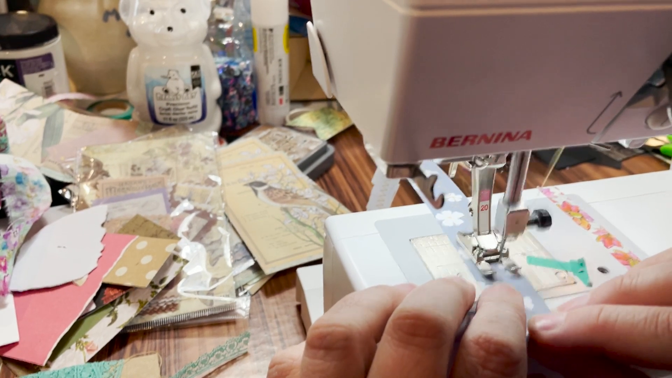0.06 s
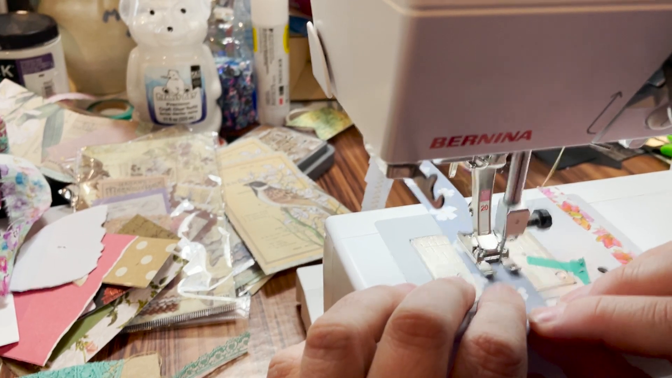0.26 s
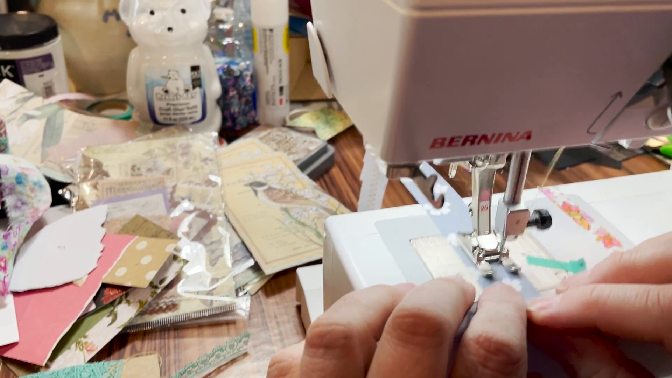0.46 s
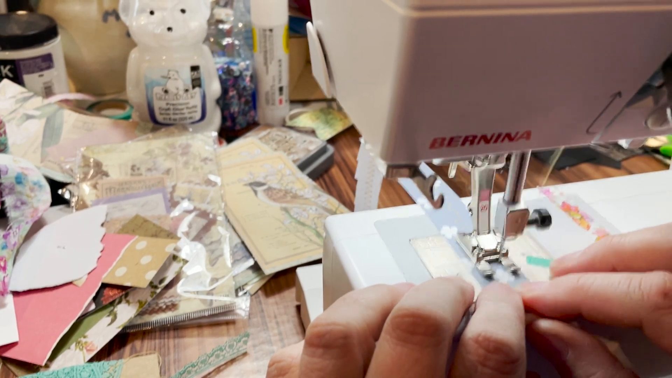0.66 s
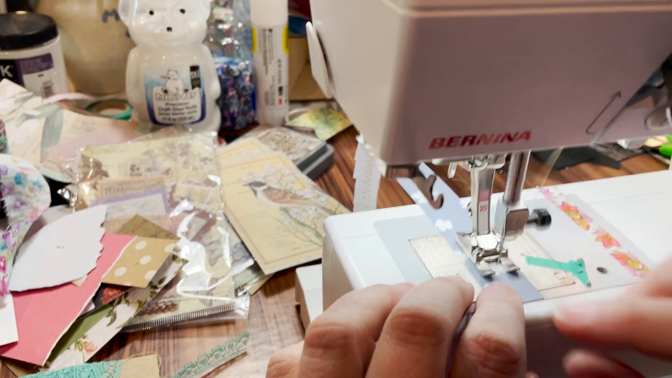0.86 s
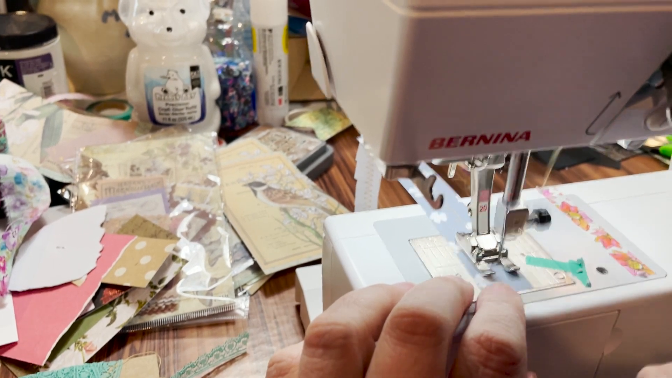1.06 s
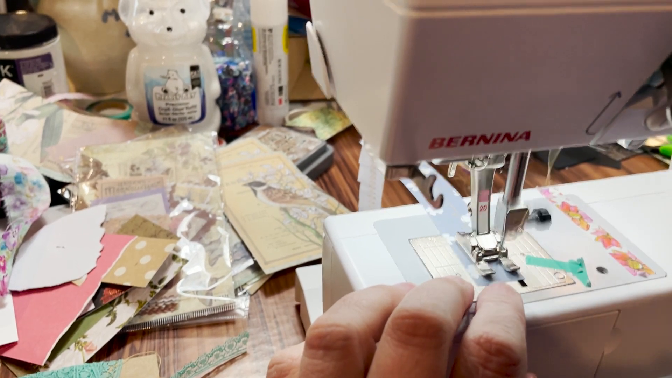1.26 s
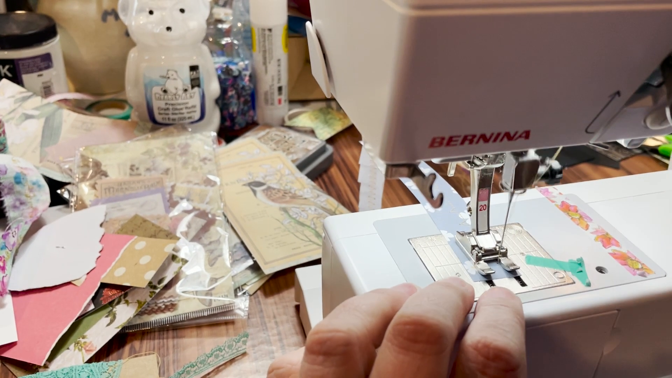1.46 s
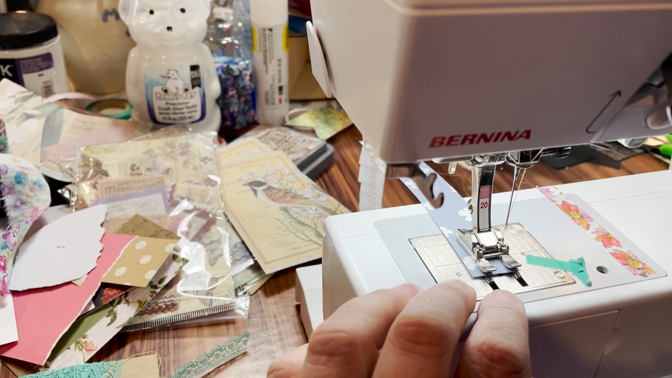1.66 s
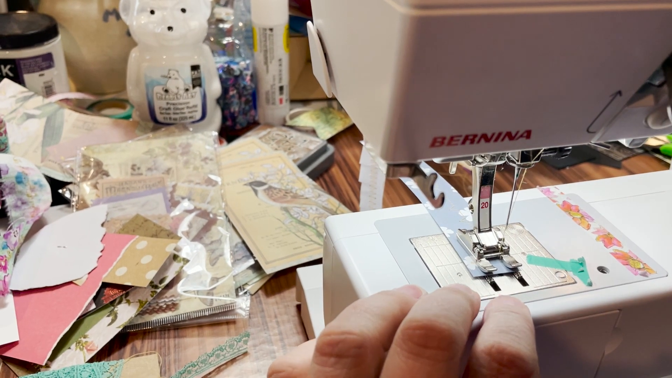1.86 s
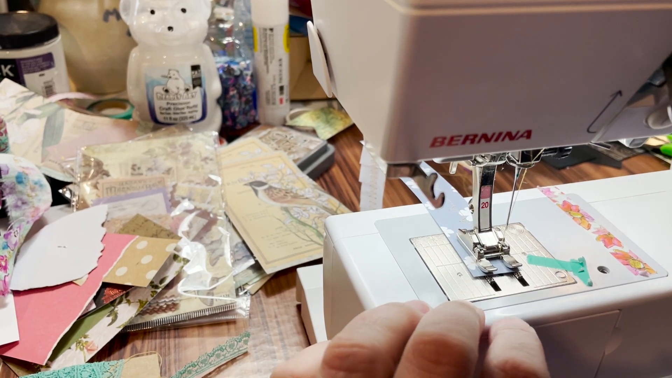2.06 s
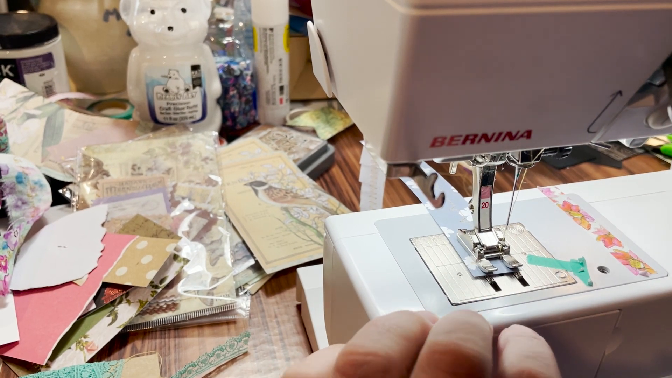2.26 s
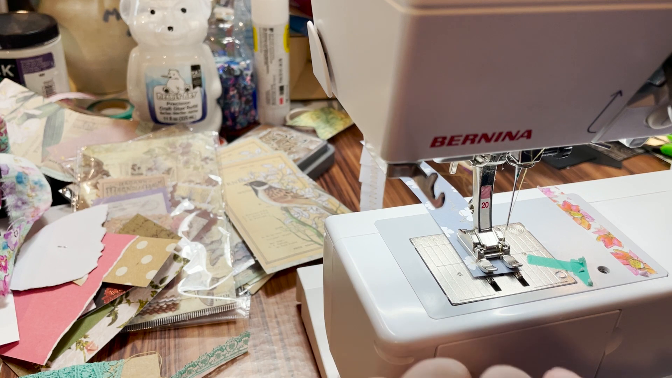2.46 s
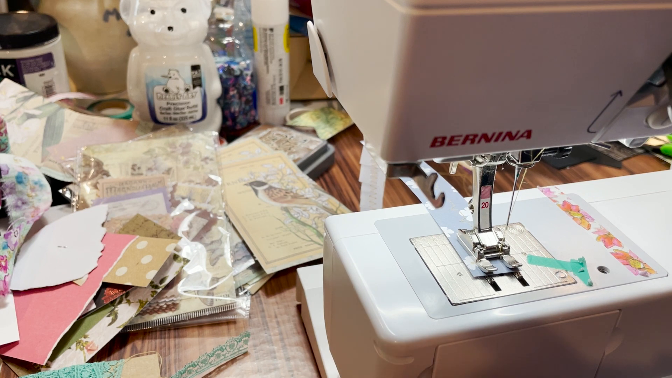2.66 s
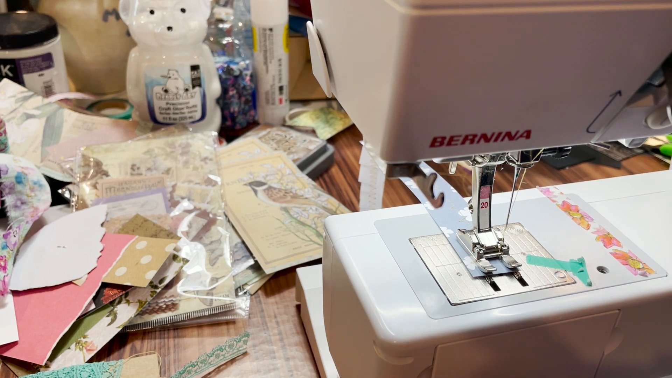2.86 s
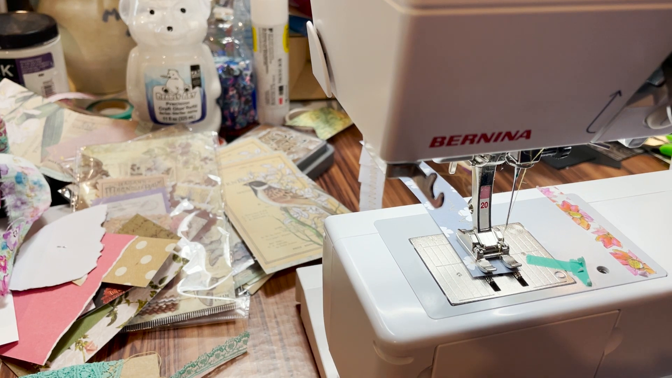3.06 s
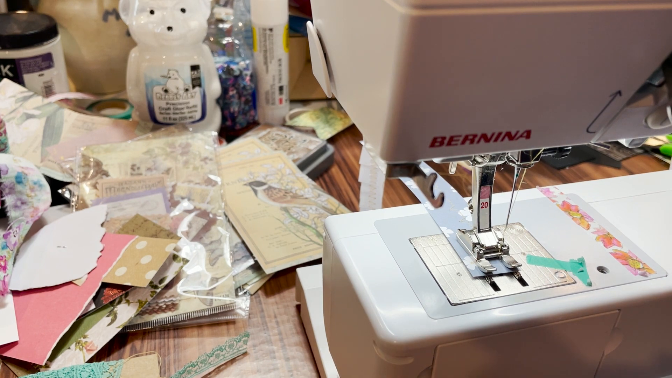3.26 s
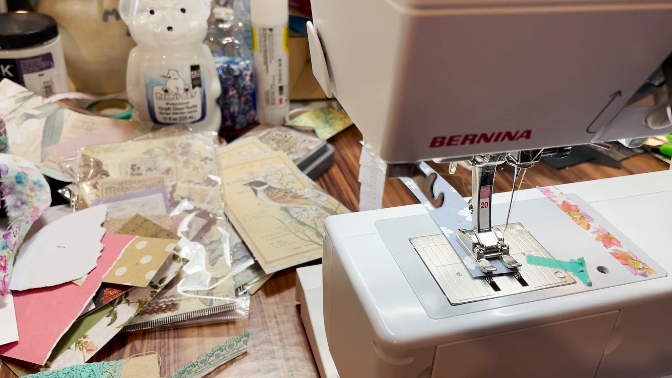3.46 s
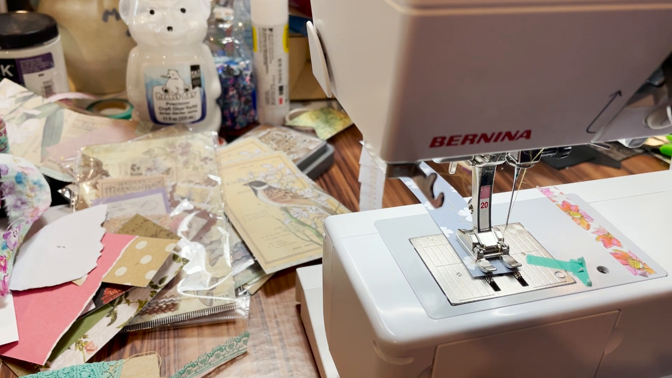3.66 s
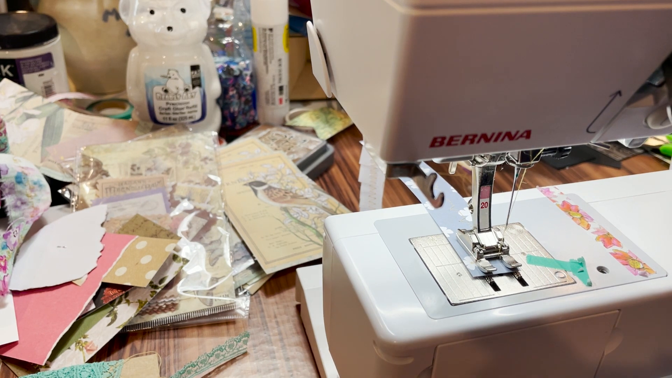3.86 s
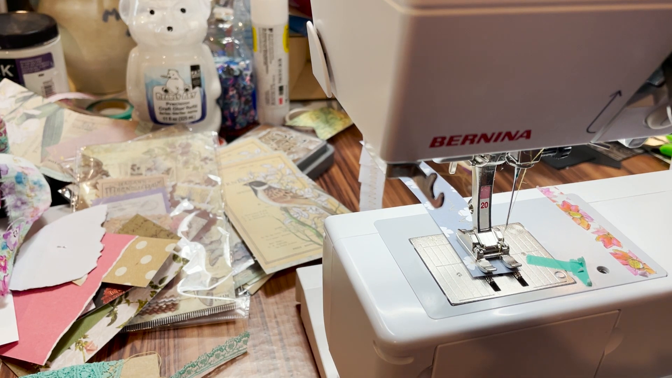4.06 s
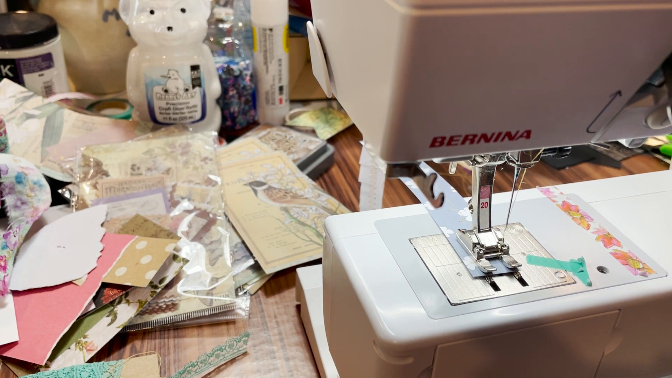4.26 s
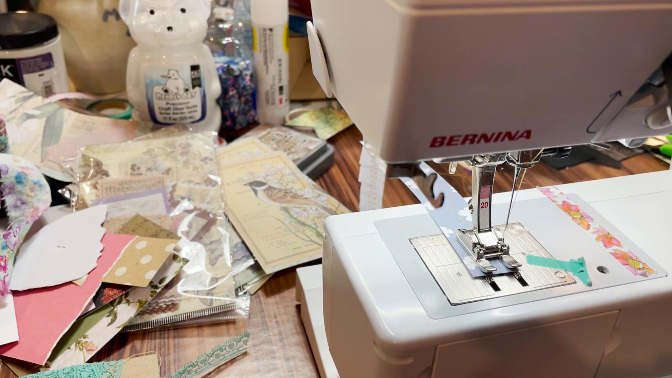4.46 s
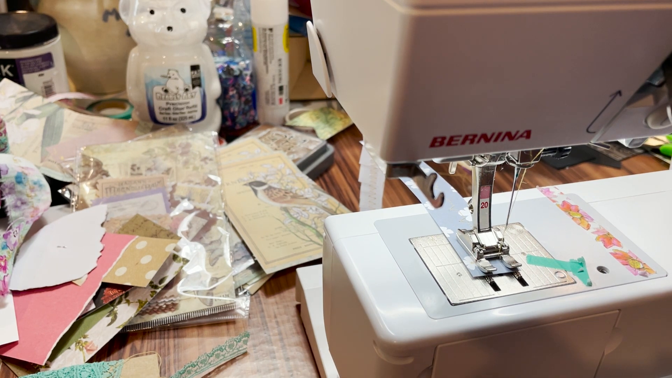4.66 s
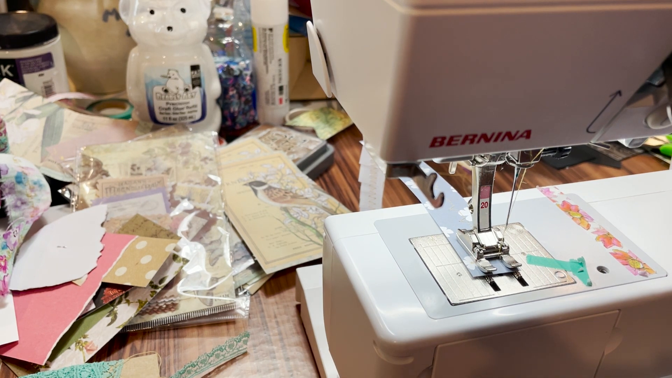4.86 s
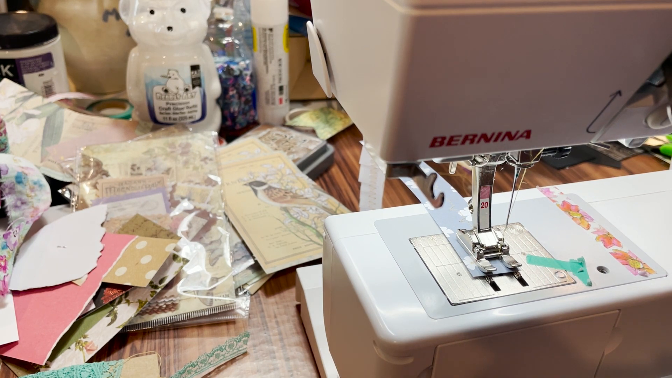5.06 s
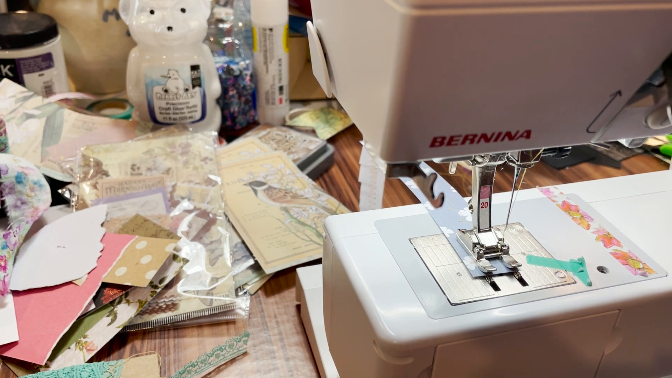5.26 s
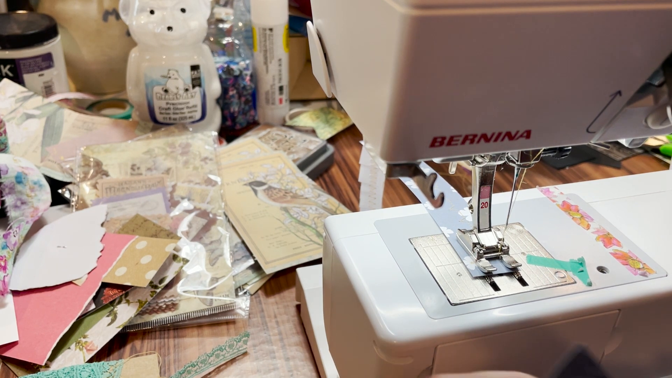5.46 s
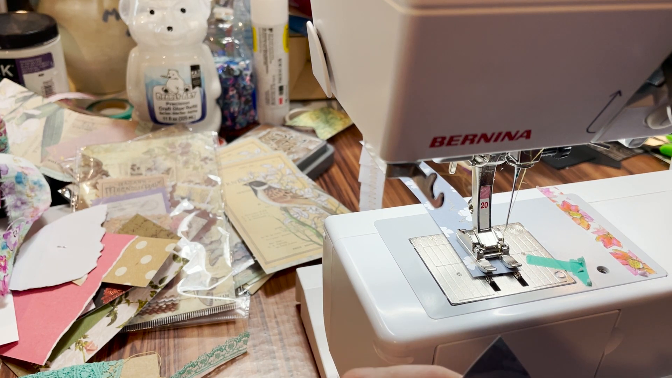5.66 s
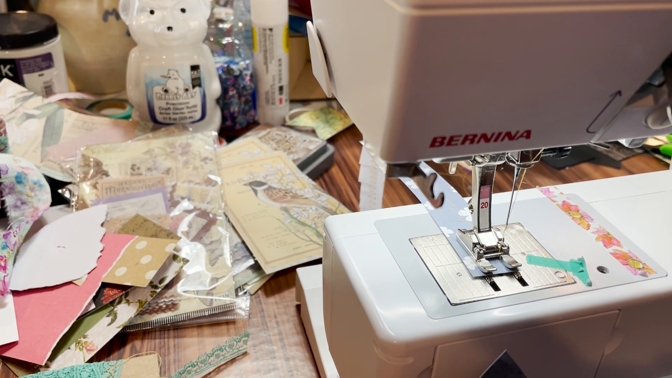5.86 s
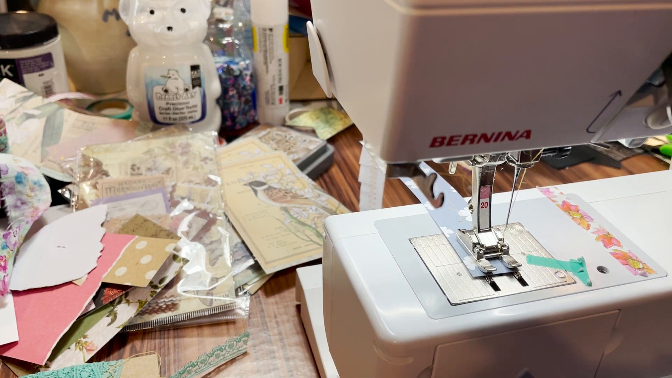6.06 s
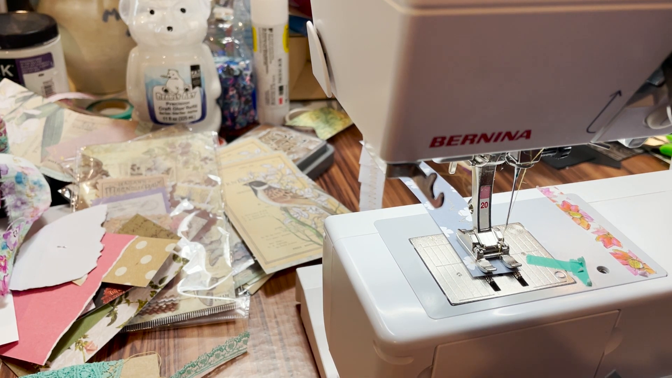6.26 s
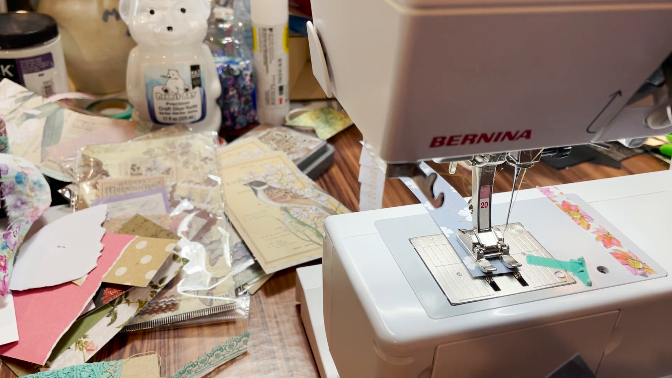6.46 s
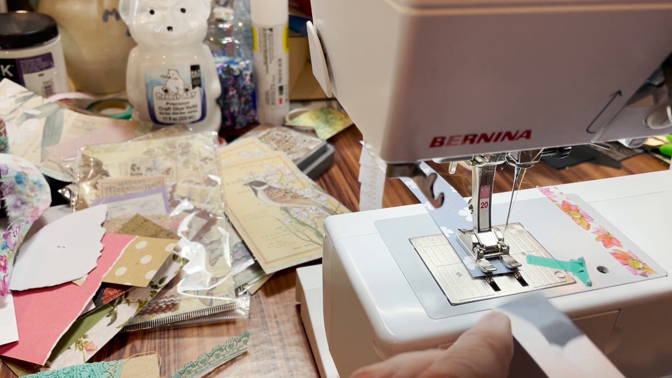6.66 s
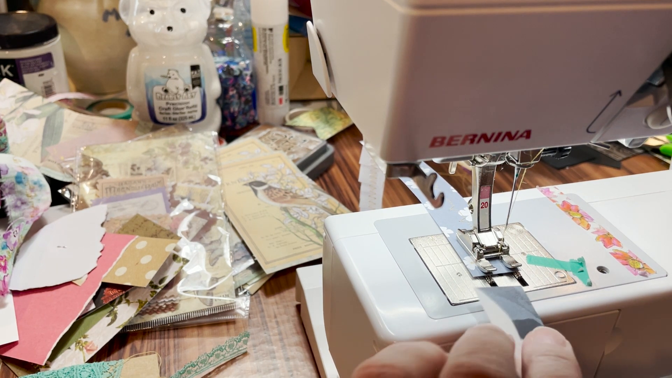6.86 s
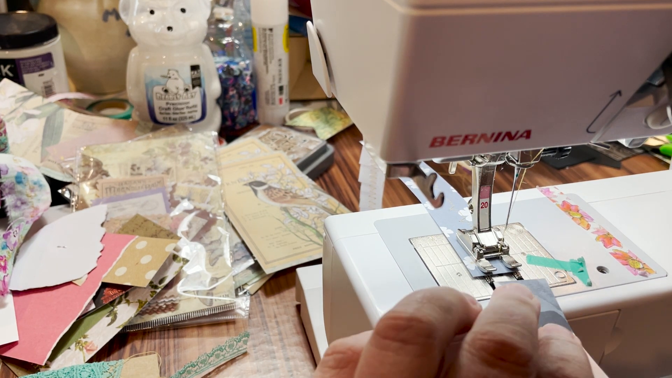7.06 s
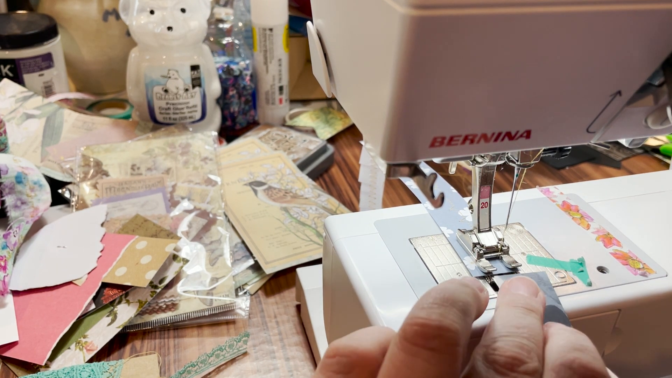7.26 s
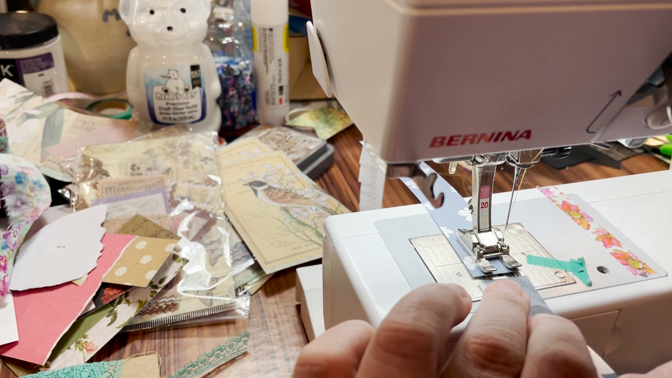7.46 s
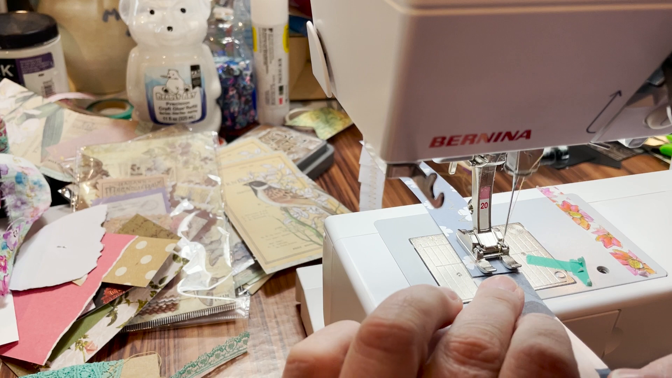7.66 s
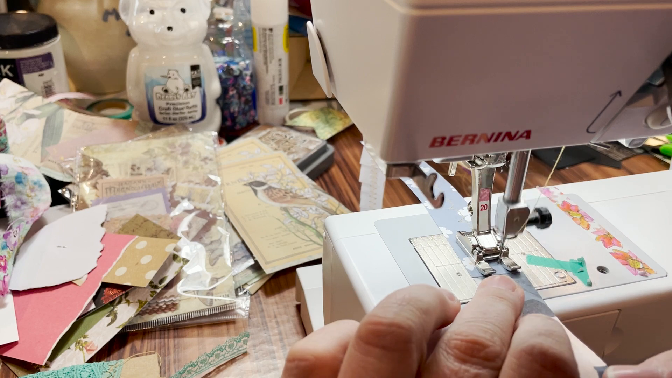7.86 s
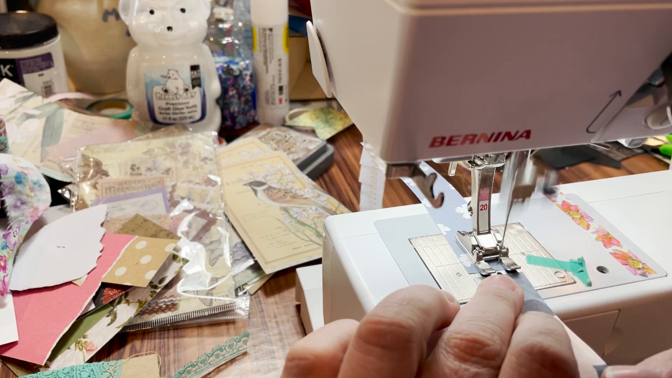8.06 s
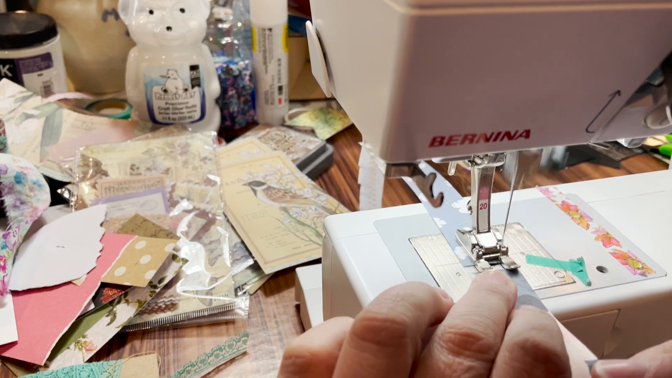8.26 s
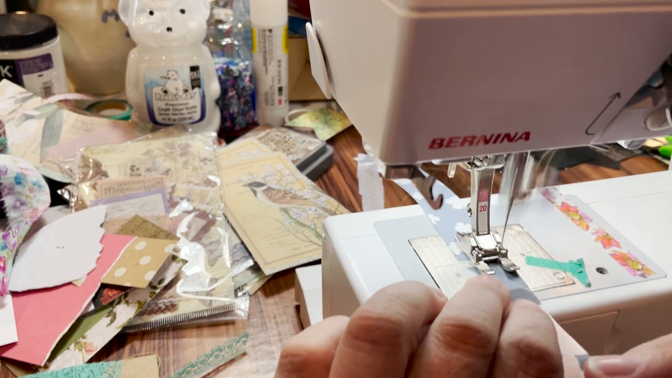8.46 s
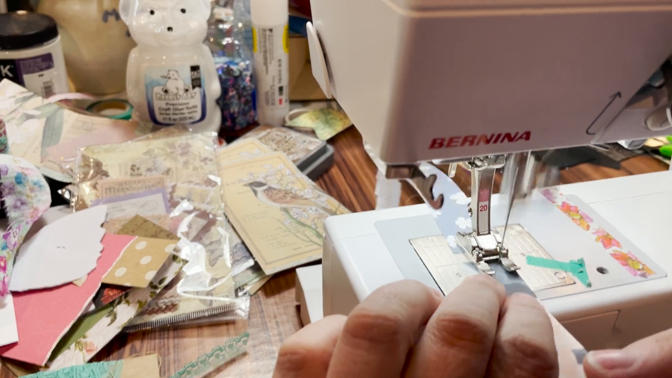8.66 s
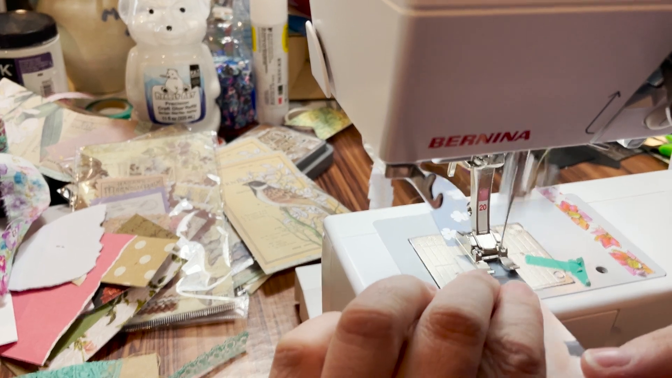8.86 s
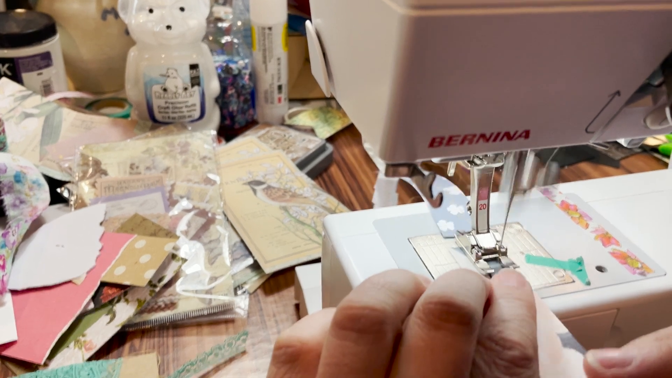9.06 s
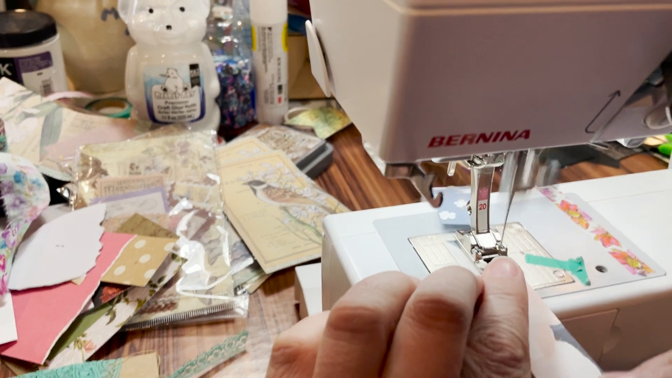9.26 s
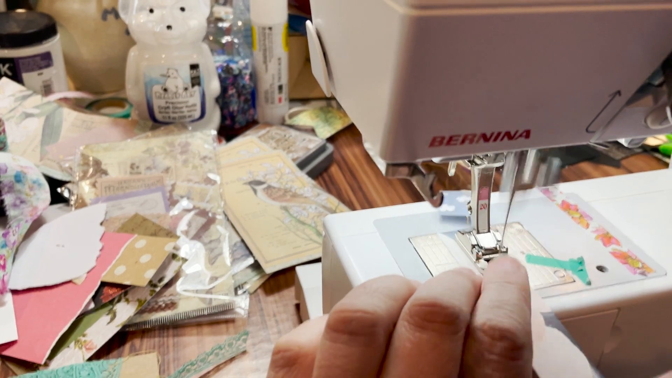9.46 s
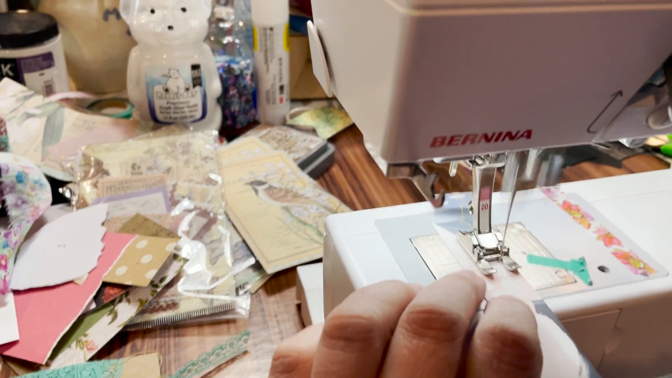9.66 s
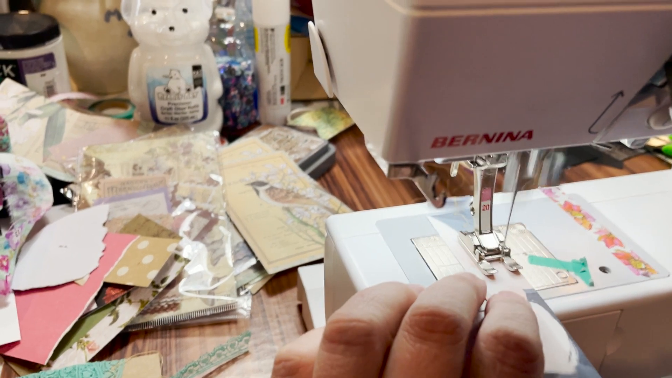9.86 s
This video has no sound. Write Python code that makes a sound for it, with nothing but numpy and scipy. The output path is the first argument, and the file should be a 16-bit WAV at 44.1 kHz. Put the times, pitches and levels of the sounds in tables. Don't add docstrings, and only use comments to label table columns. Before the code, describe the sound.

Close up in a quiet room, an electric sewing machine rattles rapidly, then coasts down with separate clunks and a thin metal ring. Soft paper rustles, finger taps and a near-silent pause follow. Sharper paper snaps mark the next strip being fed in, before the motor clunks, whines and races back to full speed.

```python
import sys
import numpy as np
from scipy import signal
from scipy.fft import rfft, irfft, next_fast_len
from scipy.io import wavfile
from scipy.ndimage import uniform_filter1d

SR = 44100
rng = np.random.default_rng(int(sys.argv[2]) if len(sys.argv) > 2 else 0)


def dump_mix(stems):
    frames = np.atleast_2d(stems).T
    limited = np.clip(frames, -1, 1)
    pcm = np.round(limited * 32767).astype(np.int16)
    wavfile.write(sys.argv[1], SR, pcm)


def volts_from_decibels(level):
    exponent = np.asarray(level, float) / 20
    return 10 ** exponent


N = 437031
T = np.arange(N) / SR
FAST = next_fast_len(N)
HZ = np.fft.rfftfreq(FAST, 1 / SR)
FULL_SPEED = 15.035


def evened(x):
    return x / np.sqrt(np.mean(x ** 2) + 1e-20)


def read(points, hz):
    f, value = np.transpose(points)
    return np.interp(np.log(hz + 1), np.log(f + 1), value)


def curves(tables):
    rows = np.vstack(tables)
    gaps = []
    for a, b in zip(tables, tables[1:]):
        if b[0][0] - a[-1][0] > .2:
            gaps.append((a[-1][0] + .015, b[0][0] - .004))
    rows = rows[np.argsort(rows[:, 0])]
    s = np.sort(np.r_[rows[:, 0], np.ravel(gaps)])
    inside = np.isin(s, rows[:, 0])
    return [np.interp(T, s, np.interp(s, rows[:, 0], c) - 60 * ~inside) for c in rows.T[1:]]


def band(x, points, lo_hz, hi_hz):
    edges = 1 / np.sqrt((1 + (lo_hz / (HZ + 1)) ** 8) * (1 + (HZ / hi_hz) ** 8))
    return evened(irfft(rfft(x, FAST) * volts_from_decibels(read(points, HZ)) * edges, FAST)[:N])


def highpass(x, order, hz):
    return signal.sosfilt(signal.butter(order, hz, "high", fs=SR, output="sos"), x)


def ring(x, hz, width):
    r, w = np.exp(-np.pi * width / SR), 2 * np.pi * hz / SR
    return signal.lfilter([0, np.sin(w)], [1, -2 * r * np.cos(w), r * r], x)


def grainy(per_s, spread_db, share):
    hits = (rng.random(N) < per_s / SR) * volts_from_decibels(spread_db * np.minimum(rng.exponential(1, N), 4))
    bursts = signal.lfilter([1], [1, -.97], hits)
    return rng.standard_normal(N) * (1 - share + share * evened(bursts))


def add(mix, s, sound):
    part = mix[round(s * SR):][:len(sound)]
    part += sound[:len(part)]


# (t/s, turns)
SHAFT = [(-.0311, -2), (1.2322, 17), (1.268, 17.52), (1.315, 18), (1.423, 18.52), (1.535, 19),
         (1.627, 19.2), (7.64, 19.21), (7.733, 19.52), (7.867, 20), (7.935, 20.52), (7.993, 21),
         (8.054, 21.52), (8.116, 22), (8.163, 22.52), (8.21, 23), (8.251, 23.52), (8.293, 24), (8.4285, 26),
         (9.959, 49)]
# (t/s, level/dB)
RUNS = [
    [(1.15, -26), (1.24, -25), (1.34, -34.5), (1.41, -45), (1.44, -42), (1.6, -49.5), (1.665, -45.5)],
    [(7.637, -44.5), (7.73, -46), (7.86, -55), (7.925, -41), (7.95, -34), (8.0, -38), (8.13, -33),
     (8.25, -29), (8.45, -26)],
]


def machine():
    turns = np.interp(T, *np.transpose(SHAFT))
    speed = uniform_filter1d(np.gradient(turns) * SR, 2500)
    level_db, = curves(RUNS)
    body = casing(level_db, speed) + rattle(turns, speed, *rattle_levels(level_db))
    body += whine() + clunks()
    body = highpass(body, 3, 170)
    rough = body + arm() + table_shake(level_db)
    return rough, drone(turns, speed, level_db) + hum(turns, speed, level_db)


def at_turns(share, jitter_s):
    s, turns = np.transpose(SHAFT)
    when = np.interp(np.arange(-1, 49) + share, turns, s) + jitter_s * rng.standard_normal(50)
    return np.clip(np.round(when * SR).astype(int), 0, N - 1), when > 0


def nearness(hz, centre_hz):
    return volts_from_decibels(-14 * abs(np.log2(hz / centre_hz)))


# (share of turn, level/dB, centre f/Hz, sign of push)
KNOCKS = [(0.027, -7.5, 899, 0.99), (0.124, -2.5, 553.2, 0.78), (0.162, -1, 403, -1.2), (0.174, 1, 1300, 1),
          (0.292, -1, 745, 0.81), (.32, 3.5, 320, 0.89), (0.531, 0, 280.7, 0.94), (0.669, -3.5, 1257, 0.93),
          (0.701, 2, 270, 1), (0.851, -8.5, 337.4, 1), (0.909, 0.5, 383.6, 1), (.94, -4.5, 615.8, 1),
          (.99, 3.5, 2300, 0.81)]
# (f/Hz, width/Hz, level/dB)
CASING = [(184, 47, 1.5), (360, 43, 2), (592.4, 49, -6), (692, 41, -2), (765, 50, 3), (942, 19, -5),
          (1070, 190, -17), (1279, 70, 3), (1534, 75, -1), (2300, 59, -8.5)]


def casing(level_db, speed):
    drone_top_hz, uneven = 760, .16
    drive, hz = np.zeros((len(CASING), N)), np.array(CASING)[:, :1]
    for share, db, centre_hz, sign in KNOCKS:
        at, live = at_turns(share, .0001)
        merged = (hz < drone_top_hz) * np.clip(speed[at] / FULL_SPEED, 0, 1) ** 3
        size = 1 - merged + uneven * rng.standard_normal(50)
        drive[:, at] += nearness(hz, centre_hz) * np.sign(sign) * live * volts_from_decibels(db) * size
    drive += 0.015 * rng.standard_normal(N)
    drive *= volts_from_decibels(level_db)
    modes = np.zeros(N)
    for k, (mode_hz, width, db) in enumerate(CASING):
        modes += (-1) ** k * volts_from_decibels(db) * ring(drive[k], mode_hz, width)
    return volts_from_decibels(3.5) * modes


ORDER_DB = [-47, -50, -41, -36, -34, -45, -38, -47, -35, -38, -41, -36, -35, -33, -33, -31, -42, -30, -39,
            -39, -46, -48, -42, -42, -45, -39, -43, -42, -43, -39, -32, -38, -47, -35, -44, -42, -39, -39,
            -45, -44, -35]
# (shaft order, level/dB)
GEAR_ORDERS = [(65, -36), (71, -43), (78, -41)]


def drone(turns, speed, level_db):
    waver_db = 3.5
    out, orders = np.zeros(N), np.arange(len(ORDER_DB)) + 9
    slow = np.arange(0, N + 512, 512)
    for k in np.arange(9, 60):
        timing = 0
        for share, db, hz, sign in KNOCKS:
            push = sign * volts_from_decibels(db) * nearness(k * FULL_SPEED, hz)
            timing += push * np.exp(-2j * np.pi * k * (share + .03))
        line_db = np.interp(k * speed[::64] / FULL_SPEED, orders, ORDER_DB, left=-75, right=-75)
        drift = uniform_filter1d(rng.standard_normal(len(slow)), 8)
        waver = np.interp(T[::64] * SR, slow, drift)
        gain = np.repeat(volts_from_decibels(line_db + waver_db * waver), 64)[:N]
        out += gain * np.cos(2 * np.pi * k * turns + np.angle(timing))
    gears = sum(volts_from_decibels(db) * np.cos(2 * np.pi * k * turns) for k, db in GEAR_ORDERS)
    out += (speed / FULL_SPEED) ** 6 * gears
    return np.sqrt(2) * volts_from_decibels(level_db + 22) * uniform_filter1d(out, 8)


def hum(turns, speed, level_db):
    push = np.sin(2 * np.pi * 4 * turns) + .15 * np.sin(2 * np.pi * 2 * turns)
    return volts_from_decibels(-40.5 + 19 + level_db) * (speed / FULL_SPEED) ** 2 * push


def table_shake(level_db):
    return volts_from_decibels(level_db - 18.5) * band(rng.standard_normal(N), FLOOR, 44, 240)


# (f/Hz, level/dB per Hz)
RATTLE = [(150, -3), (350, -2), (900, -0.5), (1300, -9), (1800, -6), (2300, -17), (2800, -15.5),
          (3900, -18), (5400, -28.5), (6300, -31.5), (8300, -29.5), (10500, -31), (12800, -29.5),
          (15500, -35.5)]
# (share of turn, level/dB, f/Hz, t60/s, scatter/dB)
TICKS = [(.02, -28.5, 6400, 0.014, 4), (.06, -29, 6300, .012, 4), (.07, -31, 12000, .008, 0),
         (.17, -31.5, 6500, .01, 4), (.06, -25, 3895, .015, -1.5), (.07, -25, 860, .02, 2.5),
         (.11, -18.5, 1781, .02, -3.5), (.145, -23, 1151, .018, 1), (.185, -29, 4000, .01, 6.5),
         (.3, -18, 860, .025, 4.5), (.65, -26, 2200, .015, 6.5), (.7, -22.5, 1150, .02, 3.5),
         (.77, -27, 999, .02, -1), (.91, -23.5, 950, .02, -3), (.96, -25.5, 2250, .015, 3)]
# (share of turn, level/dB, f/Hz, t60/s, scatter/dB)
SWING_TICK = (.18, -22, 12600, .004, 1.5)
# (tick level/dB, top rattle level/dB)
PATTERN = [(7, 4), (10, 3.5), (-3, 0.5), (-4, -1), (-4.5, 0), (0.5, -0.5)]


def rattle(turns, speed, mid_db, high_db):
    noise = clatter(grainy(700, 3.5, .3))
    depth = np.clip(speed / 6.9, .47, 1)
    mid, high, top = depth * swells(turns)
    tick_db, swing_db = np.transpose(PATTERN)
    top = top + swing_db[stitch_step(np.floor(turns))]
    out = band(noise, RATTLE, 550, 5500) * volts_from_decibels(mid_db + 0.68 + mid)
    out += band(noise, RATTLE, 5300, 9600) * volts_from_decibels(high_db - 8.0 + high)
    out += band(noise, RATTLE, 8600, 15000) * volts_from_decibels(high_db - 6.0 + top)
    for row in TICKS + [SWING_TICK]:
        share, db, hz, t60, scatter_db = row
        at, live = at_turns(share, 0.00042)
        clicks = np.zeros(N)
        scatter = .7 * scatter_db * np.clip(rng.standard_normal(50), -2, 1.5)
        swing = (row is SWING_TICK) * tick_db[stitch_step(np.arange(-1, 49))]
        clicks[at] = live * volts_from_decibels(db + scatter + swing + high_db[at] + 32.5)
        out += ring(clicks, hz, 2.2 / t60) + .6 * ring(clicks, hz * .87, 4.4 / t60)
    return out


def clatter(x):
    z = signal.stft(x, nperseg=256)[2]
    patches = rng.standard_normal(z.shape)
    for axis in (0, 1):
        patches = uniform_filter1d(patches, size=3, axis=axis)
    return signal.istft(z * volts_from_decibels(1.8 * evened(patches)), nperseg=256)[1][:N]


# (start share, length share, mid level/dB, high level/dB, top level/dB)
STROKE = [(.03, .05, 6, 10, 5.5), (.1, 0.08, 7, 3, 2), (.22, 0.12, -2.5, -5, -2.5), (.56, .06, 1.5, 1, 4),
          (.64, 0.11, 3, 3.5, -0.5), (.8, .15, -1.5, -5.5, .5)]


def swells(turns):
    rise_db, fall_db, hush_db = 149.5, 169.5, -18.5
    slow, out = turns[::16], hush_db
    for start, length, *db in STROKE:
        since = slow - start + .3
        share = since % 1 - .3
        uneven = rng.standard_normal(60)[np.floor(since).astype(int) + 3]
        slope = rise_db * np.maximum(-share, 0) + fall_db * np.maximum(share - length, 0)
        out = np.maximum(out, np.array(db)[:, None] + 1.5 * uneven - slope)
    return np.repeat(out, 16, axis=1)[:, :N]


def stitch_step(turn):
    return (turn - 3 - (turn > 19)).astype(int) % len(PATTERN)


def rattle_levels(level_db):
    cracks = np.zeros(N)
    for s, db, _, crack_db in CLUNKS:
        cracks[round(s * SR)] = volts_from_decibels(db + crack_db + 12.0)
    levels = []
    for full_db, growth, db, t60 in [(-28.5, 1.264, -15.5, .12), (-33.5, 1.5, -23.5, .06)]:
        steady = volts_from_decibels(full_db + growth * (level_db + 25.5))
        shaken = volts_from_decibels(db) * signal.lfilter([1], [1, -volts_from_decibels(-60 / t60 / SR)], cracks)
        levels.append(20 * np.log10(steady + shaken))
    return levels


# (f/Hz, level/dB per Hz)
FLOOR = [(32, -13), (52, -0.5), (130, -4.5), (180, -8.5), (250, -3), (330, -7.5), (500, -14), (900, -22),
         (2000, -23.5), (5000, -31), (9000, -35.5), (12500, -33.5), (14000, -42.5), (16000, -47)]
# (t/s, level/dB)
RUMBLE = [(1.62, -51), (1.75, -55.5), (1.85, -64), (2.7, -59.5), (3.7, -69.5), (4.85, -70.5), (5.0, -64.5),
          (5.15, -70), (5.4, -67), (5.6, -68), (6.1, -70), (6.28, -59.5), (6.35, -57), (6.42, -59),
          (6.8, -61.5), (7.05, -70), (7.63, -68.5), (7.7, -51)]
# (f/Hz, width/Hz, level/dB)
ROOM_MODES = [(58, 22, -26), (127, 16, -31), (257, 10, -40), (420, 6, -50)]
# (f/Hz, share)
FLOOR_ALIKE = [(60, 0.89), (180, 1), (550, 0.67), (1650, -0.33), (4970, -0.029), (15000, -0.12)]


def floor():
    a, b = rng.standard_normal((2, N))
    c = np.clip(read(FLOOR_ALIKE, HZ), -1, 1)
    other = irfft(c * rfft(a, FAST) + np.sqrt(1 - c ** 2) * rfft(b, FAST), FAST)[:N]
    pair = np.array([a, other])
    lumps = uniform_filter1d(uniform_filter1d(rng.standard_normal(N), 2500), 2500)
    rumble_db = np.interp(T, *np.transpose(RUMBLE)) + 1.2 * evened(lumps)
    tones = sum(volts_from_decibels(db) * ring(pair, hz, width) for hz, width, db in ROOM_MODES)
    tones = highpass(tones, 4, 44)
    wash = np.array([band(x, FLOOR, 15, 440) for x in pair])
    hiss = np.array([band(x, FLOOR, 600, 17000) for x in pair])
    return volts_from_decibels(rumble_db) * evened(wash + tones) + volts_from_decibels(-84.5) * hiss


def room(x):
    t = np.arange(SR // 2) / SR
    taps = rng.standard_normal((2, len(t))) * (t > .006)
    dull = signal.lfilter([.1], [1, -.9], taps) * volts_from_decibels(-60 * t / 0.21)
    tail = dull + 0.015 * taps * volts_from_decibels(-60 * t / 0.06)
    return signal.fftconvolve(x[None], tail / np.linalg.norm(tail[0]), axes=1)[:, :N]


# (start t/s, length t/s, from f/Hz, to f/Hz, peak level/dB)
WHINE = [(1.275, .03, 1376, 1300, -29), (1.31, .055, 1230, 980, -29), (1.325, .055, 340, 320, -28.5),
         (7.779, .12, 290, 314, -46), (7.94, .028, 954, 917, -25), (7.983, .072, 1061, 1020, -30.5),
         (8.048, .065, 1306, 1196, -29.5), (8.122, .035, 740, 779, -21), (8.175, .025, 1255, 1270, -28),
         (8.06, .05, 742, 697, -26), (1.548, .045, 4770, 5000, -50.5), (1.6, .022, 4890, 5080, -46),
         (7.953, .03, 5000, 5000, -46), (8.057, .02, 4800, 4880, -42)]


def whine():
    out = np.zeros(N)
    for start, length, from_hz, to_hz, db in WHINE:
        t = np.arange(0, length, 1 / SR) / length
        jitter, flutter = (evened(uniform_filter1d(v, size=200)) for v in rng.standard_normal((2, len(t))))
        hz = (from_hz + (to_hz - from_hz) * t) * (1 + .022 * jitter)
        swell_db = np.interp(t, [0, .15, 1], [-10, 0, -10])
        gain = volts_from_decibels(db + swell_db + 4.5 * flutter) * signal.windows.tukey(len(t), .2)
        add(out, start, gain * np.sin(2 * np.pi * np.cumsum(hz) / SR))
    return out


def hit(db, hz, t60, thud_db=-30, crack_db=-6):
    t = np.arange(6000) / SR
    decay = volts_from_decibels(-60 * t / (.25 * t60)) + .09 * volts_from_decibels(-60 * t / (2.5 * t60))
    burst = rng.standard_normal(len(t)) * decay
    burst *= 1.5 * np.minimum(t / .002, 1)
    modes = ring(burst, hz, .3 * hz) - .7 * ring(burst, 1.7 * hz, .5 * hz)
    tone = evened(modes) * np.std(burst)
    crack = signal.lfilter([.6, .12, -.48], [1], burst)
    thud = volts_from_decibels(thud_db + 1.0) * np.sin(2 * np.pi * 170 * t) * volts_from_decibels(-60 * t / 0.098)
    return volts_from_decibels(db) * (1.2 * volts_from_decibels(crack_db) * crack + 0.47 * tone + 0.082 * burst + thud)


# (t/s, peak level/dB, ring f/Hz,
# crack level/dB beside the peak)
CLUNKS = [(1.3715, -30.5, 303.4, -8.5), (1.4239, -29.5, 1875, -5.5), (1.4353, -24.5, 226.4, -19),
          (1.455, -33, 299, -21.5), (1.496, -41, 1476, -8), (1.537, -31.5, 869, -5),
          (1.538, -38, 1490, -6.5), (1.577, -37.5, 1530, -20), (1.423, -34, 2246, -19.5),
          (1.538, -36, 4000, -23), (1.6, -40, 1620, -9), (1.661, -32.5, 900, -17.5),
          (7.638, -29.5, 417, -45), (7.6565, -37, 349, -13.5), (7.7335, -44, 2600, -5),
          (7.8074, -41, 2800, -25), (7.868, -35.5, 1900, -24), (7.902, -44, 1900, -3),
          (7.935, -32, 1200, -14), (7.9509, -25, 343, -32), (7.993, -31, 2920, -11),
          (8.054, -28.5, 1850, -7), (8.118, -35, 3000, -18), (8.163, -22.5, 3500, -5.5),
          (8.197, -28, 3090, -24), (8.251, -27.5, 3000, -2.5), (8.13, -25.5, 780, -17),
          (8.0161, -20, 360, -18.5), (8.134, -9.5, 338, -31), (8.229, -17, 337, -41),
          (8.186, -23.5, 350, -30.5), (8.272, -19.5, 345.5, -29), (8.296, -20.5, 700, -31.5),
          (8.308, -17, 348.3, -35), (7.82, -52, 2500, -16), (7.878, -41.5, 2980, -16)]


def clunks():
    out = np.zeros(N)
    for s, db, hz, crack_db in CLUNKS:
        add(out, s, hit(db, hz, 0.087, -24, crack_db))
    return out


# (f/Hz, level/dB per Hz)
RUSTLE = [(400, 14.5), (800, -9), (1400, -6), (2200, -15.5), (3200, -6), (4500, -3.5), (6000, -8.5),
          (8400, -8.5), (10500, -4), (13000, -5.5), (15500, -15)]


def rustle():
    noise = shifting(grainy(300, 4, .17), 1.6)
    edges_hz = [(850, 2000), (2000, 8500), (8500, 17000)]
    return sum(gain * band(noise, RUSTLE, *edge) for gain, edge in zip(strokes(), edges_hz))


# (start t/s, length t/s, start level/dB, end level/dB, brightness/dB)
CLEARING = [(2.106, 0.031, -71, -85, -5), (2.29, .09, -92, -86, -17.5), (2.392, 0.14, -76.5, -80.5, -14.5),
            (2.511, 0.072, -79.5, -55.5, -0.5), (2.585, 0.14, -74.5, -75, -7),
            (2.767, 0.11, -66, -86, -14.5), (2.86, 0.076, -72, -55, 4.5), (2.963, 0.11, -60.5, -71.5, 3),
            (3.14, 0.43, -68.5, -71.5, 2), (3.765, 0.05, -83.5, -88, 16.5), (3.88, .03, -88.5, -89, 18.5)]
# (start t/s, length t/s, start level/dB, end level/dB, brightness/dB)
SORTING = [
    (1.55, 0.066, -57.5, -58, 9),
    (4.33, .05, -92, -94.5, 11.5),
    (4.527, 0.07, -87.5, -90, 15),
    (4.833, 0.051, -72.5, -69.5, 14.5),
    (4.897, 0.071, -66, -75, 10.5),
    (4.99, 0.069, -68.5, -78, 9.5),
    (5.073, 0.34, -70, -61, 11.5),
    (5.423, 0.019, -76, -87, -13.5),
]
# (start t/s, length t/s, start level/dB, end level/dB, brightness/dB)
FEEDING = [(6.103, 0.17, -76.5, -84, 1), (6.277, 0.043, -65.5, -70, 1.5), (6.364, 0.042, -70, -62, 2),
           (6.448, 0.035, -70, -52, 8), (6.51, 0.14, -59.5, -79.5, -1.5), (6.648, 0.13, -69, -67, 1.5),
           (6.835, 0.052, -73, -66, 6), (6.925, 0.059, -62.5, -67, 6.5), (6.998, 0.078, -67.5, -72.5, 4.5),
           (7.15, .11, -72, -76, 6), (7.288, 0.21, -84, -78, 14.5), (7.35, 0.13, -78.5, -76, -11.5),
           (7.531, 0.051, -71.5, -74.5, 1)]
# (body level/dB, hiss level/dB)
SHEETS = [
    (-5.5, -12.5),
    (-2.5, -3.5),
    (-3, -3),
]


def strokes():
    rise_db, fall_db = 598.5, 900
    slow, power = T[::32], 0
    for rows, (body_db, hiss_db) in zip([CLEARING, SORTING, FEEDING], SHEETS):
        for start, length, start_db, end_db, bright_db in rows:
            end = start + length
            db = np.interp(slow, [start - .1, start, end, end + .15],
                           [start_db - .1 * rise_db, start_db, end_db, end_db - .15 * fall_db])
            tilt_db = np.array([[body_db - bright_db], [0], [hiss_db + bright_db]])
            power = power + volts_from_decibels(db + tilt_db) ** 2
    return [np.interp(T, slow, np.sqrt(p)) for p in power]


# (from t/s, to t/s, from f/Hz, to f/Hz, level/dB)
SHEET_SHAPE = [(2.304, 3.57, 1985, 2220, -16.5), (2.86, 3.576, 1666, 1750, -9),
               (3.103, 3.572, 5930, 5920, -10.5), (3.1, 3.57, 4910, 5040, 4),
               (3.097, 3.57, 7100, 7100, 0.5), (3.14, 3.57, 1200, 1150, 6), (3.14, 3.567, 3400, 3500, 6),
               (2.25, 2.76, 2200, 2580, 7.5), (4.8, 5.34, 3610, 3350, -10.5), (4.8, 5.42, 5670, 5450, -1),
               (4.804, 5.45, 1936, 1890, 9.5), (4.802, 5.45, 2243, 2210, 10), (5.1, 5.419, 4260, 4300, -8),
               (4.83, 4.88, 5000, 4900, 14), (4.798, 4.95, 6460, 6370, 7), (5.056, 5.45, 1400, 1200, 7),
               (6.5, 7.068, 5660, 6000, -9), (6.52, 6.75, 2600, 2500, 5.5), (7.35, 7.595, 1293, 1260, 6)]


def shifting(x, patchy_db):
    hz, t, z = signal.stft(x, SR, nperseg=512)
    patches = uniform_filter1d(uniform_filter1d(rng.standard_normal(z.shape), 8, 0), 30, 1)
    db = patchy_db * evened(patches)
    for from_s, to_s, from_hz, to_hz, shape_db in SHEET_SHAPE:
        centre_hz = np.interp(t, [from_s, to_s], [from_hz, to_hz])
        away = np.log2((hz[:, None] + 1) / centre_hz) / 0.078
        db = db + shape_db * np.exp(-away ** 2) * ((t > from_s) & (t < to_s))
    return signal.istft(z * volts_from_decibels(db), nperseg=512)[1][:N]


# (f/Hz, level/dB, t60/s)
RING = [(495, -69.5, 1.3), (1082, -64, .95)]


def arm():
    out, t = np.zeros(N), np.arange(SR) / SR
    add(out, 1.66, sum(volts_from_decibels(db - 60 * t / t60) * np.sin(2 * np.pi * hz * t) for hz, db, t60 in RING))
    return out


def hands():
    return rustle() + taps() + snaps() + flick()


def light_hits(rows, thud_db):
    out = np.zeros(N)
    for s, db, hz, crack_db in rows:
        add(out, s, hit(db, hz, 0.067 * (1000 / hz) ** 0.21, thud_db, crack_db))
    return out


# (t/s, peak level/dB, ring f/Hz, crack level/dB beside the peak)
TAPS = [(1.853, -54.5, 4320, -7), (2.103, -55, 1070, -15), (2.394, -46, 730, -24), (2.577, -48.5, 1450, 0),
        (3.142, -60, 2900, 7), (3.594, -52.5, 7100, 10), (3.597, -62, 2500, -2), (3.765, -58, 7110, -10.5),
        (5.553, -52, 1290, -4), (5.554, -49.5, 4500, -4), (6.098, -62, 1280, 3), (6.27, -39.5, 1570, -7)]


def taps():
    return light_hits(TAPS, -7.5)


# (t/s, peak level/dB, ring f/Hz, crack level/dB beside the peak)
SNAPS = [(2.417, -45.5, 1160, -26), (2.505, -50, 4800, -13), (2.686, -54, 5000, -4),
         (2.765, -50, 3800, -14), (2.776, -43.5, 1350, -23), (2.853, -53, 1200, -8), (2.93, -50, 4420, -12),
         (2.97, -63, 4500, -3), (2.996, -54, 3240, 11), (5.084, -56, 1500, -10), (5.38, -56, 1200, -14),
         (5.418, -48, 1610, -8), (6.378, -36.5, 4600, -5), (6.484, -48, 4000, -4), (6.49, -39, 1000, -19),
         (6.5, -50, 3000, -17), (6.505, -31, 1500, -18), (6.516, -26.5, 6900, -24), (6.52, -40, 3400, -12),
         (6.524, -38, 800, -19), (6.566, -47, 1640, -18), (6.585, -44, 2200, -12), (6.589, -36, 1120, -25),
         (6.647, -39.5, 2900, -13), (6.721, -41.5, 5070, -10), (6.827, -59, 3000, 4),
         (6.884, -53, 1290, -5), (6.893, -29.5, 2940, -2), (6.895, -35.5, 950, 1), (6.992, -34, 1140, -7),
         (7, -37.5, 3050, 7.5), (7.001, -39, 1300, -12), (7.351, -38.5, 592, -34), (7.545, -58, 1305, 2)]


def snaps():
    return light_hits(SNAPS, -24.5)


# (t/s, level/dB, from f/Hz, to f/Hz, glide t/s, t60/s)
POP = (6.4965, -21, 900, 4250, .0011, .009)


def flick():
    s, db, from_hz, to_hz, glide_s, t60 = POP
    out, t = np.zeros(N), np.arange(0, 2 * t60, 1 / SR)
    hz = to_hz + (from_hz - to_hz) * np.exp(-t / glide_s)
    swell = np.minimum(t / glide_s * 2, 1) * volts_from_decibels(-60 * np.maximum(t - 1.9 * glide_s, 0) / t60)
    add(out, s, volts_from_decibels(db) * swell * np.sin(2 * np.pi * np.cumsum(hz) / SR))
    return out


def ports(x, lead, lean, alike, late_s):
    grid = np.arange(0, SR, 25)
    delay_s = np.interp(HZ, grid, rng.uniform(.002, late_s, len(grid)))
    other = np.exp(-2j * np.pi * np.cumsum(delay_s) * HZ[1])
    c = np.clip(read(alike, HZ), -1, 1)
    z, g = rfft(x, FAST), volts_from_decibels(read(lean, HZ) / 2)
    right = z / g * (c * np.exp(-1j * read(lead, HZ)) + np.sqrt(1 - c ** 2) * other)
    return irfft(np.array([z * g, right]), FAST)[:, :N]


# (f/Hz, lead/rad)
MACHINE_LEAD = [(230, -.05), (430, -.6), (780, 1.8), (1120, 6), (2330, 6.2), (2840, 7.6), (4650, 7.5),
                (5250, 7.9), (5680, 4.7), (6630, 5.5), (7580, 3.6), (8300, 3.4), (13200, .2), (16000, -.2)]
# (f/Hz, level/dB)
MACHINE_LEAN = [(60, -.5), (110, 0), (230, .5), (300, -8), (400, -9.5), (700, 1), (1290, 0.0), (2380, 1.4),
                (4400, .4), (8400, 0), (15000, 0)]
# (f/Hz, share)
ALIKE = [(60, .9), (190, .99), (350, .96), (700, .8), (1400, .85), (2800, .68), (5600, .58), (7600, .9),
         (8500, .99), (13000, .92)]
# (f/Hz, lead/rad)
HAND_LEAD = [(300, 0), (1460, -.8), (3190, .6), (4050, -1), (5500, -2), (5800, -2.9), (6370, -.5),
             (8100, -2.5), (9200, -4), (16000, -6.6)]


def scene():
    (sewing, lines), paper = machine(), hands()
    near = ports(sewing, MACHINE_LEAD, MACHINE_LEAN, ALIKE, .02)
    near += ports(lines, MACHINE_LEAD, MACHINE_LEAN, [(100, 1), (9000, 1)], .02)
    paper_alike = [(1000, .95), (3000, .8), (6500, .75), (8300, .9)]
    near += ports(paper, HAND_LEAD, [(100, 0), (9000, 0)], paper_alike, .005)
    return near + volts_from_decibels(-17.0) * room(sewing + paper) + floor()


def band_limit(x):
    return signal.sosfilt(signal.butter(12, 16480, fs=SR, output="sos"), x)


def record(dry):
    edge = signal.firwin(801, 15750, window=("kaiser", 9), fs=SR)
    mix = signal.oaconvolve(dry, edge[None], "same")
    return band_limit(mix)


dry = scene()
out = record(dry)
dump_mix(out)
```